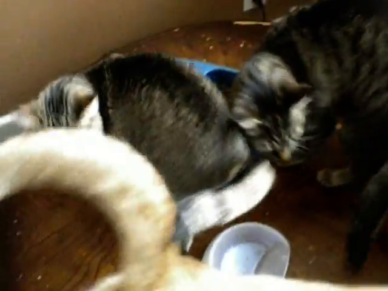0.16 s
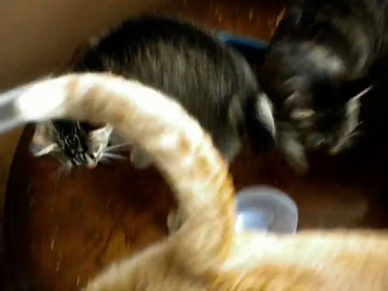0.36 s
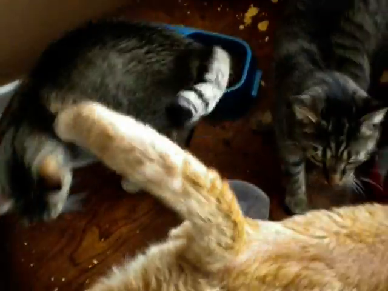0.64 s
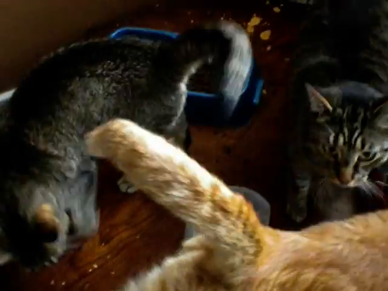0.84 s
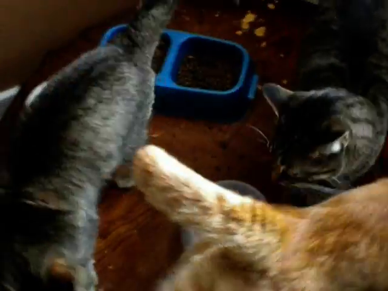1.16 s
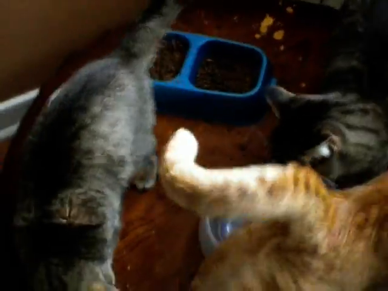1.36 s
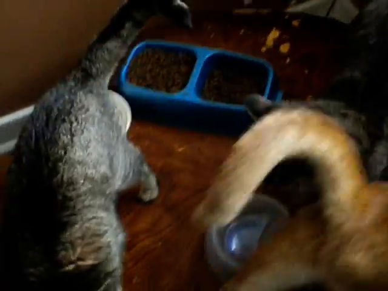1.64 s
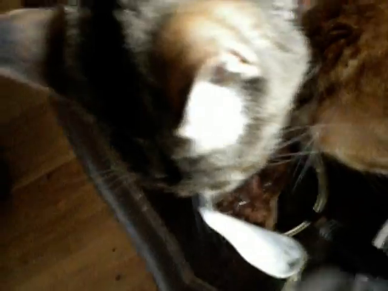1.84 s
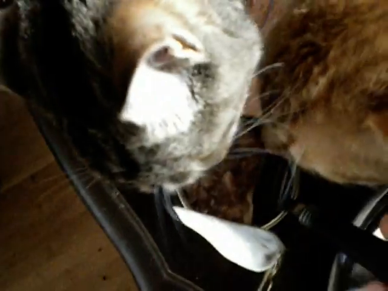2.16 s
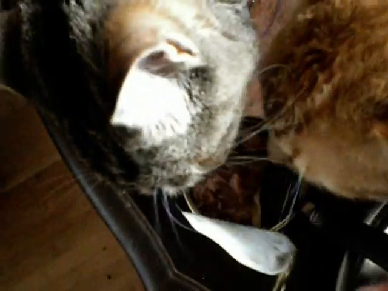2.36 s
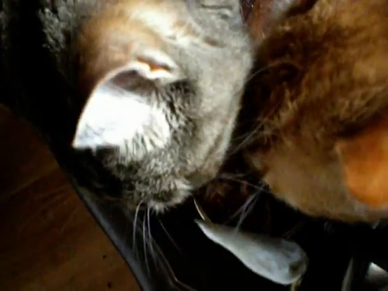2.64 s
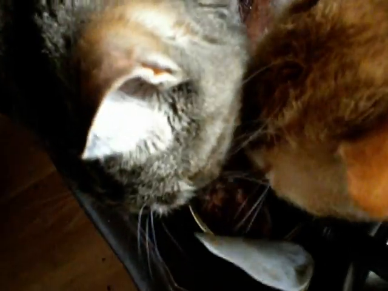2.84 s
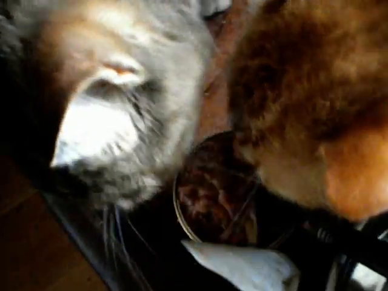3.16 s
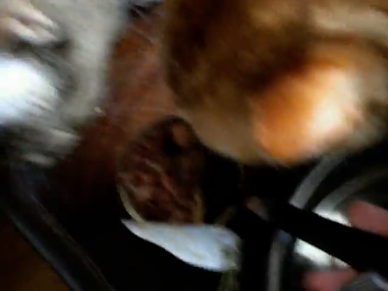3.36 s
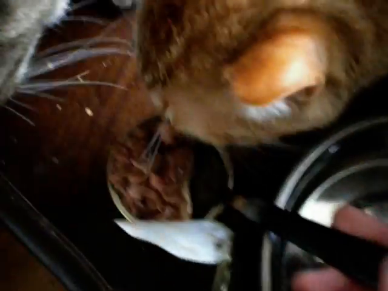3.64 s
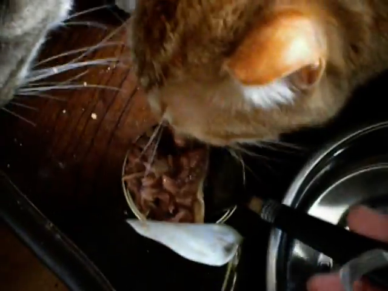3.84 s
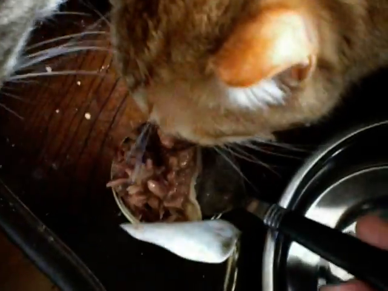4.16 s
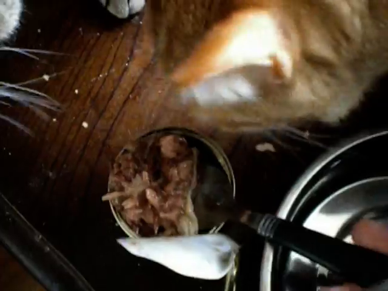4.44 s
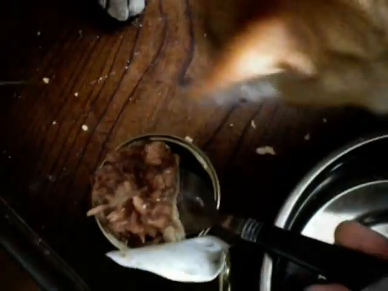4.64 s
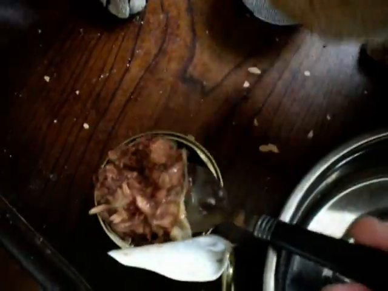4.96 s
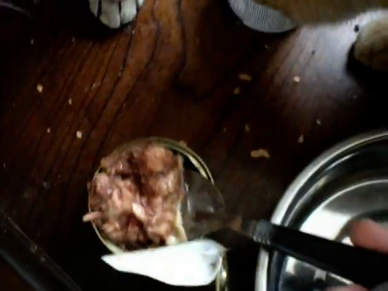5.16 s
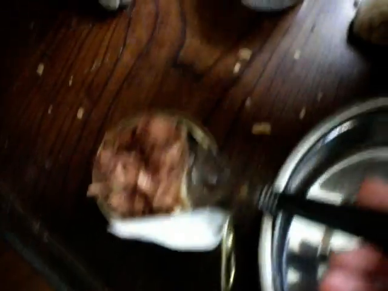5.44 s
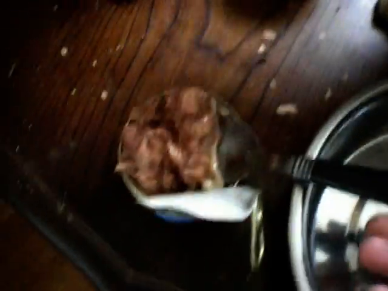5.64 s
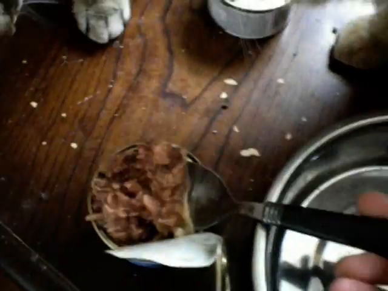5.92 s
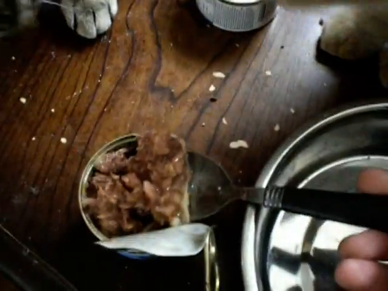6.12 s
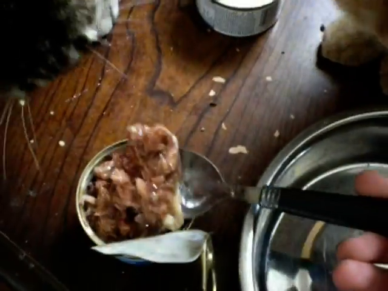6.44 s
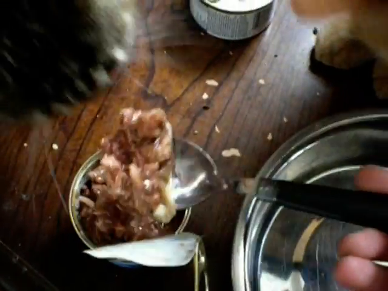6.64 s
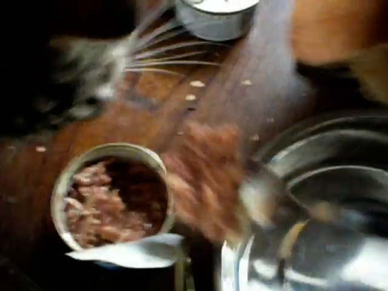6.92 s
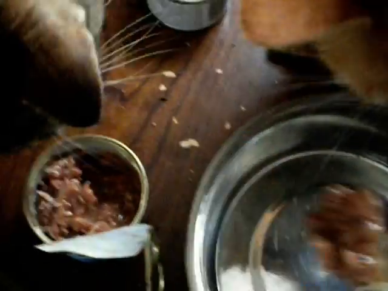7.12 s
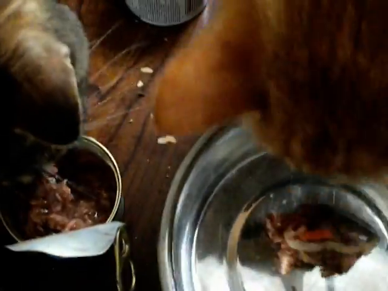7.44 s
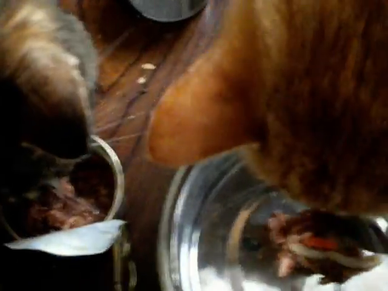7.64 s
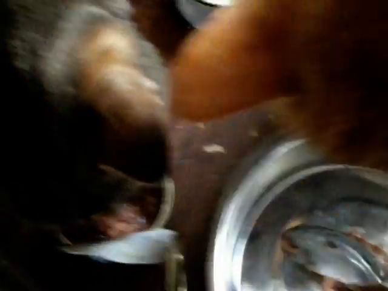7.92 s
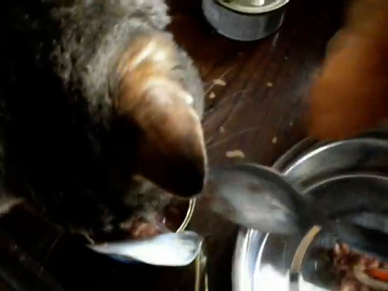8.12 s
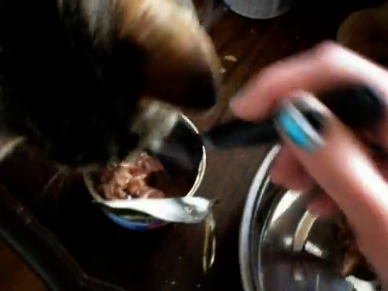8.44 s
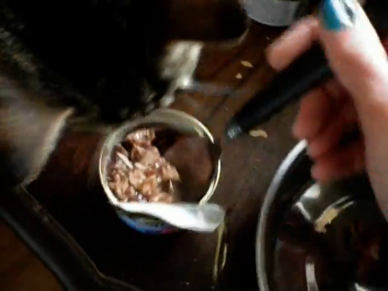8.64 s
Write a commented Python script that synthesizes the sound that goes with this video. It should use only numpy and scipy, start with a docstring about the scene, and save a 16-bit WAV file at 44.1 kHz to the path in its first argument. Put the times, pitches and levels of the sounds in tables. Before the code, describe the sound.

In a quiet room, a spoon ticks lightly in a small tin, with muffled scrapes through wet food and soft shuffling on boards. The sound briefly drops to silence early on. Sharper clinks follow, the tin bounces on wood, then two loud bangs hit a steel bowl, which rattles briefly. A hard singing scrape around the tin ends it. A cheap, close camera microphone gives thin, gritty sound.

```python
"""Spoon, tin and steel bowl

A metal spoon ticks and scrapes in a small food tin, knocks the tin on a wooden floor and bangs a steel
bowl, which rattles on, while cats shuffle around in a quiet room. Blows ring lists of modes; scrapes and
rattle drive the same modes with irregular slips; shuffling and air are coloured noise. A small camera
stores 8000 eight-bit samples a second: quiet air turns to coarse fizz, bangs overload, one stretch is mute."""
import sys
import numpy as np
from scipy import signal
from scipy.fft import rfft, irfft, next_fast_len
from scipy.io import wavfile
from scipy.ndimage import map_coordinates

SR = 44100
rng = np.random.default_rng(int(sys.argv[2]) if len(sys.argv) > 2 else 0)


def generate_wav(sig):
    """Save sig (samples, or channels by samples) to the path in sys.argv[1] as 16-bit PCM at SR."""
    pcm = np.round(np.clip(np.atleast_2d(sig).T, -1, 1) * 32767).astype(np.int16)
    wavfile.write(sys.argv[1], SR, pcm)


def gain_from_db(level_db):
    """Turn a decibel level (scalar or array-like) into a linear amplitude factor."""
    decades = np.asarray(level_db, float) / 20
    return 10 ** decades


N = 387374  # samples

# Levels are set ahead of the room, the microphone and the storage.
# Spoon on the tin: start_s, peak_db, low_db, mid_db, top_db (near 550, 2300, 3300 Hz over the 1450 Hz ping)
TIN_TICKS = [(0.697, -29, 11.5, -7, 0.5), (1.236, -28.5, -21, -30, -12), (1.917, -20.5, 0.5, -6.5, -20.5),
             (1.961, -25.5, -0.5, 13.5, 14.5), (2.094, -30.5, 5, 2.5, -16), (2.121, -27, -1.5, -3, -5),
             (2.171, -21.5, -15.5, -13, -12.5), (2.221, -26.5, -16.5, 9, -4.5), (2.445, -29.5, 2, 15, -11),
             (2.484, -26, 4, -3, -20), (2.625, -24, -9, 2, 4), (2.641, -24.5, -23, 13, 12.5),
             (2.666, -22.5, -2.5, -1.5, 6), (2.678, -26, 3, 17.5, 0), (2.836, -28.5, -27.5, -9, -12.5),
             (2.842, -23, -24, -10, -19.5), (2.943, -22.5, 11, 9, -14), (3.075, -26, -18, -3, -7.5),
             (3.241, -21.5, -18.5, 1, -19.5), (3.341, -29.5, -18, -13.5, -19.5),
             (4.0, -21, -36, -12.5, -25.5), (4.295, -7.5, -24, -13.5, -6), (4.443, -9, -19.5, -10, -7.5),
             (4.888, -27.5, -2, -10, -28), (5.078, -28, -5.5, -11.5, -17), (5.281, -16, -19, -10, -7.5),
             (5.512, -28, -7, -1, -12), (5.99, -27, -12, -4.5, -8), (6.119, -27, -13.5, 3, 2),
             (6.291, -33.5, -0.5, -1.5, -18), (6.432, -23, -1, 1, -6.5), (6.592, -28, -1, 0, -4),
             (8.448, -6.5, -15.5, -3.5, -10.5)]
# Dry clicks of the spoon's edge, hardly ringing: same columns as the ticks
EDGE_CLICKS = [(3.575, -25, -16, 6.4, -2), (3.741, -30, -12, 8, 9), (3.917, -22.5, -16, 26, 16),
               (5.058, -33, -14, 6, -6)]
# Centres of a tick's colour bands: pitch_hz
TICK_BANDS = [550, 1450, 2300, 3300]
# Tin drops and bounces on the boards: start_s, peak_db, dullness_db (near 450 Hz over 1500 Hz)
TIN_BOUNCES = [(4.638, -18, 2.5), (4.644, -7, 2), (4.651, -15.5, -11.5), (4.669, -8, 8), (4.676, -7, 4.5),
               (4.691, -12, 8.5), (4.713, -22.5, 5.5), (4.729, -28.5, 8.5)]
# Spoon on the bowl: start_s, peak_db, low_db, mid_db, top_db (near 450, 950, 2700 Hz over 1500 Hz)
BOWL_BANGS = [(7.4385, 4.5, -18, -9, -21), (7.7875, 5.5, -14, 7, -6)]
# Bowl's rim on the boards, three touches each: the columns of the bangs, then loss_per_touch_db
RIM_KNOCKS = [(7.629, -20, 18, -1, -4, .4), (8.63, -7, -10, -6, -18, 6.5)]
# Centres of the colour bands for bounces, bangs and knocks: pitch_hz
BLOW_BANDS = [450, 950, 1500, 2700]
# Modes of the tin, ringing freely: pitch_hz, level_db, t60_s
TIN_MODES = [(445, -8.5, 0.012), (754, -4, 0.041), (1310, -6, 0.04), (1389, -2.5, 0.05), (1559, 3, .09),
             (1667, -7, 0.067), (2057, -3.5, 0.023), (2308, 0, .05), (2652, -4, 0.045), (3037, -2, 0.065),
             (3467, -9.5, 0.062), (3872, -7, 0.04)]
# Modes of the wooden boards: pitch_hz, level_db, t60_s
BOARD_MODES = [(366, -12.5, 0.04), (544.4, -6, 0.096), (614, -7, 0.034), (683, -7.5, 0.065),
               (948, -5, 0.093), (1470, -5.5, 0.02), (1680, -3, 0.013), (2860, -1.5, 0.018),
               (3890, -10.5, 0.12)]
# Modes of the steel bowl, ringing freely: pitch_hz, level_db, t60_s
BOWL_MODES = [(339, 0, 0.097), (540, -1, 0.098), (701, 2, 0.11), (742, -9.5, 0.13), (940, -2.5, 0.094),
              (1011, -1.5, 0.7), (1050, 1.5, 0.1), (1228, -6.5, 0.26), (1254, 3, 0.12), (1378, 2.5, 0.16),
              (1760, -9, 0.18), (1974, -10, 0.041), (2196, -14, 0.15), (2640, -6.5, 0.043),
              (3045, -7, 0.057), (3500, -4, .045)]
# Bowl rocking after a blow: start_s, then level_db near 450, 950, 1500 and 2700 Hz
BOWL_RATTLE = [(7.456, -40, -44, -34, -44), (7.648, -48.5, -48.5, -51, -62.5),
               (7.802, -32.5, -28, -33.5, -42)]
# Spoon scraping through the food: start_s, length_s, level_db, brightness_db
FOOD_SCRAPES = [(1.238, 0.0066, -38.5, -22.5), (1.949, 0.046, -50, 0), (2.062, .015, -49.5, -3.5),
                (2.091, .05, -44.5, 0), (2.155, .03, -44.5, -7.5), (2.389, .03, -48, -14),
                (2.444, 0.11, -46, -1.5), (2.614, 0.064, -54.5, 5.5), (2.722, 0.055, -50, -0.5),
                (2.947, 0.058, -44, 0), (3.076, 0.3, -44, -2), (3.244, 0.033, -34.5, -12.5),
                (3.335, 0.017, -46, -6.5), (3.464, 0.21, -53, -3.5), (4.311, 0.05, -45.5, -4),
                (4.48, 0.26, -51.5, -2), (4.772, .34, -48, -6.5), (5.51, 0.014, -47, -8.5),
                (5.937, .05, -47.5, -1.5), (6.168, 0.062, -46, -9.5), (6.292, 0.034, -45.5, -15),
                (6.394, 0.035, -45.5, -9.5), (6.493, 0.075, -51, -6.5), (8.099, 0.071, -51.5, -1.5)]
# Last hard stroke round the tin: time_s, scrape_db, brightness_db, low_modes_db
HARD_STROKE = [(8.462, -24.5, -11, -27), (8.472, -25.5, -10.5, -26), (8.481, -15.5, -13, -36.5),
               (8.494, -15, -10, -31.5), (8.505, -25, -8, -28), (8.523, -26.5, -12, -28.5),
               (8.558, -34, -14.5, -38.5), (8.575, -29.5, -13.5, -37.5), (8.62, -34.5, -11, -39.5),
               (8.655, -46.5, -5.5, -31), (8.683, -45, -9.5, -40), (8.78, -48.5, -13, -47.5)]
# Paws and tin shuffling on the boards: start_s, length_s, level_db
FLOOR_SCUFFS = [(0.03, 0.18, -49), (0.7, .15, -49), (1.915, .03, -44.5), (2.43, .14, -48),
                (2.73, .03, -48.5), (2.95, 0.022, -41.5), (3.11, .18, -39.5), (3.34, .36, -43),
                (3.73, .2, -47.5), (4.5, .06, -49), (4.76, 0.059, -49), (5.07, 0.021, -45),
                (5.765, 0.011, -44.5), (5.95, .04, -44.5), (6.41, .03, -47), (8.07, 0.028, -48.5),
                (8.36, 0.072, -49)]
# Colour of the shuffling: pitch_hz, relative_db (per Hz)
SHUFFLE_COLOUR = [(150, -21.5), (250, -7), (330, -0.5), (450, -3.5), (650, -9.5), (1100, -6), (1600, -25)]
# Colour of the steady room noise: pitch_hz, relative_db (per Hz)
AIR_COLOUR = [(24, -40.5), (40, -14), (92, -0.5), (122, -15.5), (291, 4.5), (367, -6.5), (396, -3),
              (1260, -1.5), (1530, -11.5), (4000, -12), (5200, -35), (8800, -120)]
# Colour of the dull rumble: pitch_hz, relative_db (per Hz)
RUMBLE_COLOUR = [(90, -24.5), (150, -3), (230, -1), (320, -11), (500, -41.5)]
# Low hum and rumble coming and going: time_s, hum_db, rumble_db
HUM_AND_RUMBLE = [(0, -66, -53.5), (1.3, -63.5, -50), (1.8, -68.5, -55.5), (2.7, -65.5, -61.5),
                  (3, -54, -55.5), (4, -58, -56.5), (5, -62.5, -60), (6, -55.5, -56.5), (7, -52.5, -56.5),
                  (7.5, -64.5, -57.5), (8.8, -54, -51)]
# Decay of the room's answer: pitch_hz, t60_s
ROOM_DECAY = [(200, 0.57), (1000, 0.41), (4000, 0.3)]
# The stretch of muted storage: from_s, to_s
MUTED = (1.3131, 1.8062)


def along(points, hz):
    """Reads (pitch_hz, value) points off a log frequency axis."""
    point_hz, value = np.transpose(points)
    return np.interp(np.log(hz + 1), np.log(point_hz + 1), value)


def curves(rows):
    """One dB curve for each column after the time; -99 dB before the first row and after the last."""
    s, *cols = np.transpose(rows)
    return [np.interp(np.arange(N) / SR, s, c, -99, -99) for c in cols]


def unit(x):
    """Scales to rms 1."""
    return x / np.sqrt(np.mean(x ** 2))


def filtered(x, response):
    """Shapes x by a response given as a function of frequency."""
    m = next_fast_len(N + SR)
    spectrum = rfft(x, m) * response(np.fft.rfftfreq(m, 1 / SR))
    return irfft(spectrum, m)[:N]


def hiss(colour):
    """Coloured noise of rms 1."""
    return unit(filtered(rng.standard_normal(N), lambda hz: gain_from_db(along(colour, hz))))


def wobble(rate):
    """A smooth random curve with rate knots a second."""
    knots = rng.standard_normal(int(N * rate / SR) + 4)
    return map_coordinates(knots, [np.arange(N) * rate / SR])


def swells(rows, idle_db):
    """Gain of strokes that rise, hold and fade over small movements that never stop, under uneven pressure."""
    onset_s, fade_s = 0.0096, 0.03
    waver_db, waver_per_s = 2.5, 25
    t, gain = np.arange(N) / SR, np.full(N, gain_from_db(idle_db))
    for s, length, db in rows:
        corners = [s - onset_s, s, s + length, s + length + fade_s]
        gain = np.maximum(gain, gain_from_db(db) * np.interp(t, corners, [0, 1, 1, 0]))
    return gain * gain_from_db(waver_db * wobble(waver_per_s))


def struck(blows, band_hz, modes, crack_db, crack_s, ring_db, knock_s, rise_s):
    """Each blow colours its modes: a noise crack, a short knock damped by the contact, then free ringing."""
    travel_s = 0.0015  # from the blow to the microphone
    out, t = np.zeros(N + SR), np.arange(SR // 2) / SR
    hz, level, t60 = np.transpose(modes)[:, :, None]
    envelope = (1 - np.exp(-(t / rise_s) ** 2)) * np.cos(np.pi * t) ** 2  # rises fast, ends at rest
    crack_fade = gain_from_db(crack_db) * (gain_from_db(-60 * t / crack_s) + gain_from_db(7.0 - 60 * t / 0.0061))
    mode_fade = gain_from_db(ring_db - 60 * t / t60) + gain_from_db(-60 * t / knock_s)
    for s, db, *colour in blows:
        # little thump, little fizz
        tint = [(150, colour[0] - 26), *zip(band_hz, colour), (6000, colour[-1] - 18)]
        phase = 2 * np.pi * hz * t + rng.normal(0, 0.44, hz.shape)
        mode_gain = gain_from_db(level + along(tint, hz) + rng.normal(0, 2, hz.shape))
        ring = mode_gain * mode_fade * np.sin(phase)
        noise = rfft(crack_fade * rng.standard_normal(len(t)))
        crack = irfft(noise * gain_from_db(along(tint, np.fft.rfftfreq(len(t), 1 / SR))), len(t))
        blow = (ring.sum(axis=0) + crack) * envelope
        out[round((s + travel_s) * SR):][:len(t)] += gain_from_db(db) * blow / abs(blow).max()
    return out[:N]


def slipped(modes, low_hz, high_hz, grit_db, damp):
    """Irregular small slips drive the modes between two pitches, widened by the contact; rms 1."""
    slips = rng.standard_normal(N) * gain_from_db(grit_db * rng.exponential(1, N) ** 0.7)
    body = [(c, db, damp / t60) for c, db, t60 in modes if low_hz < c < high_hz]

    def resonance(f):
        """Sum of band-pass resonances, each with centre c and width w in Hz."""
        return sum(gain_from_db(db) * 1j * f * w / (c * c - f * f + 1j * f * w) for c, db, w in body)

    return unit(filtered(slips, resonance))


def drag(low, high, damp):
    """The tin's middle and upper modes sing under a dragging spoon, each group with its own gain."""
    middle = slipped(TIN_MODES, 1000, 1800, grit_db=5, damp=damp)
    upper = slipped(TIN_MODES, 1800, 4000, grit_db=4, damp=damp)
    return low * middle + high * upper


def spoon_ticks():
    """Spoon taps ring the tin's modes, with ten fainter taps at random while the spoon digs."""
    dig_from_s, dig_to_s = 1.9, 6.7
    scatter_db = 3 * rng.standard_normal(size=(10, 4))
    when = rng.uniform(dig_from_s, dig_to_s, size=10)
    faint = np.column_stack([when, scatter_db + [-37, -5, -3, -9]])  # peak, then low, mid and top dB
    blows = [(s, db, low, 0, mid, top) for s, db, low, mid, top in [*TIN_TICKS, *faint]]
    return struck(blows, TICK_BANDS, TIN_MODES,
                  crack_db=6.5, crack_s=0.025, ring_db=-8.5, knock_s=0.025, rise_s=0.00055)


def edge_clicks():
    """The spoon's edge clicks drily: a strong, very short crack over hardly any ring."""
    blows = [(s, db, low, 0, mid, top) for s, db, low, mid, top in EDGE_CLICKS]
    return struck(blows, TICK_BANDS, TIN_MODES,
                  crack_db=16.5, crack_s=0.0048, ring_db=-27.5, knock_s=0.005, rise_s=0.00048)


def tin_bounces():
    """The tin bounces on the boards' modes; duller blows gain near 950 Hz, later ones lose treble."""
    blows = [(s, db, dull, -6 + dull / 2, 0, -10.5 - 0.8 * k)
             for k, (s, db, dull) in enumerate(TIN_BOUNCES)]
    return struck(blows, BLOW_BANDS, BOARD_MODES,
                  crack_db=6.5, crack_s=0.022, ring_db=-2, knock_s=0.018, rise_s=0.00055)


def bowl_bangs():
    """The spoon bangs the bowl and touches again, softer and duller; the rim knocks three times over."""
    rebound_s, rebound_db, rebound_top_db = 0.0055, -11.5, -5
    chatter_s = 0.0054  # from one touch of the rim to the next
    spoon = [(s + k * rebound_s, db + k * rebound_db, low, mid, 0, top + k * rebound_top_db)
             for s, db, low, mid, top in BOWL_BANGS for k in range(2)]
    rim = [(s + k * chatter_s, db - k * loss, low, mid, 0, top)
           for s, db, low, mid, top, loss in RIM_KNOCKS for k in range(3)]
    return struck(spoon + rim, BLOW_BANDS, BOWL_MODES,
                  crack_db=6, crack_s=0.021, ring_db=-27, knock_s=0.016, rise_s=0.00073)


def bowl_rattle():
    """The rocking bowl keeps touching the boards, which shakes its modes in bursts that die away."""
    rock_s, settle_db_per_s = 0.07, 214.5  # steady, then dying
    linger_db, linger_db_per_s = -19.5, 45.5  # a faint part stays longer
    edges_hz = [250, 750, 1150, 1800, 4000]
    gains = np.zeros((4, N))
    for s, *db in BOWL_RATTLE:
        t = np.arange(N) / SR - s
        settling = gain_from_db(-settle_db_per_s * np.clip(t - rock_s, 0, None))
        lingering = gain_from_db(linger_db - linger_db_per_s * abs(t))
        gains += gain_from_db(db)[:, None] * (settling + lingering) * (t > 0)
    out = np.zeros(N)
    for gain, low_hz, high_hz in zip(gains, edges_hz, edges_hz[1:]):
        out += gain * gain_from_db(1.5 * wobble(45)) * slipped(BOWL_MODES, low_hz, high_hz, grit_db=3.5, damp=2.3)
    return out


def food_scrapes():
    """Dragged through food, the spoon slips against the tin's modes, heavily damped and so muffled."""
    idle_db, idle_bright_db = -55, -4
    low = swells([(s, length, db) for s, length, db, _ in FOOD_SCRAPES], idle_db)
    high = swells([(s, length, db + bright) for s, length, db, bright in FOOD_SCRAPES],
                  idle_db + idle_bright_db)
    return drag(low, high, damp=8.0)


def hard_stroke():
    """The last hard stroke sings in lightly damped modes and shakes the tin's low ones."""
    scrape_db, bright_db, base_db = curves(HARD_STROKE)
    singing = drag(gain_from_db(scrape_db), gain_from_db(scrape_db + bright_db), damp=2.4)
    return singing + gain_from_db(base_db) * slipped(TIN_MODES, 300, 1000, grit_db=5.5, damp=6.6)


def shuffling():
    """Paws and tin rub the boards: dull noise in soft swells over a constant faint movement."""
    return swells(FLOOR_SCUFFS, idle_db=-53) * hiss(SHUFFLE_COLOUR)


def air():
    """Steady room noise, with a dull noise rumble and a faint 95 Hz sine hum that come and go."""
    hum_db, rumble_db = curves(HUM_AND_RUMBLE)
    hum = np.sqrt(2) * gain_from_db(hum_db) * np.sin(2 * np.pi * 95 * np.arange(N) / SR)
    return gain_from_db(-51) * hiss(AIR_COLOUR) + gain_from_db(rumble_db) * hiss(RUMBLE_COLOUR) + hum


def room(x):
    """Noise tails whose pitches die at their own speeds; each quarter second gets a fresh tail."""
    out, piece = np.zeros(N + SR), SR // 4
    for start in range(0, N, piece):
        hz, t, z = signal.stft(rng.standard_normal(SR // 2), SR, nperseg=256)
        decay = gain_from_db(-60 * t / along(ROOM_DECAY, hz)[:, None])
        build_up = np.clip(t / 0.01, 0, 1)
        tail = signal.istft(z * decay * build_up, SR, nperseg=256)[1]
        wet = signal.fftconvolve(x[start:start + piece], tail / np.linalg.norm(tail))
        out[start:start + len(wet)] += wet
    return out[:N]


def scene():
    """Mixes the blows and their room answer with rattle, scrapes, shuffling and air."""
    blows = spoon_ticks() + edge_clicks() + tin_bounces() + bowl_bangs()
    rubbing = food_scrapes() + hard_stroke() + shuffling()
    return (blows + gain_from_db(-15.0) * room(blows) + bowl_rattle() + rubbing + air())[None]


def low_pass(x):
    """Removes everything above the highest recorded frequency."""
    return signal.sosfilt(signal.butter(12, 5150, fs=SR, output="sos"), x)


def record(dry):
    """A bass-shy microphone, 8-bit storage that rounds down, soft interpolated playback and overload."""
    stored_size, played_size = 80, 441  # samples per 10 ms
    steps = 128  # per unit of amplitude
    blocks = N // played_size + 2

    def microphone(hz):
        """Triple bass roll-off at 130 Hz and a steep anti-alias filter at 3850 Hz."""
        return (1j * hz / (1j * hz + 130.0)) ** 3 / np.sqrt(1 + (hz / 3850) ** 30)

    thin = np.pad(filtered(dry[0], microphone), (0, blocks * played_size - N))
    levels = np.floor(signal.resample(thin, blocks * stored_size) * steps)
    stored = levels.clip(-steps, steps - 1) / steps
    t = np.arange(len(stored)) / (100 * stored_size)
    stored = stored * ((t < MUTED[0]) | (t > MUTED[1]))

    # repeating the stored spectrum makes mirror images, which leak just above half the stored rate
    k = np.arange(len(thin) // 2 + 1)
    above_hz = k * SR / len(thin) - 50 * stored_size
    slope = (1 - np.tanh(above_hz / 610.0 + (above_hz / 1200.0) ** 3)) / 2
    images = np.fft.fft(stored)[k % len(stored)]
    played = irfft(images * slope, len(thin))[:N] * played_size / stored_size
    mix = (0.98 * played).clip(-1, 1)[None]
    return low_pass(mix)


dry = scene()
out = record(dry)
generate_wav(out)
```